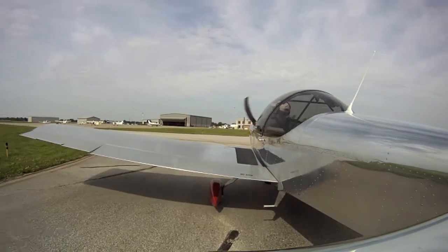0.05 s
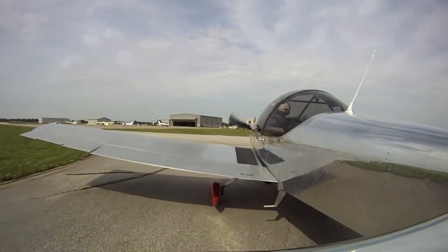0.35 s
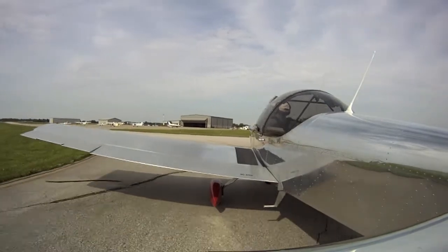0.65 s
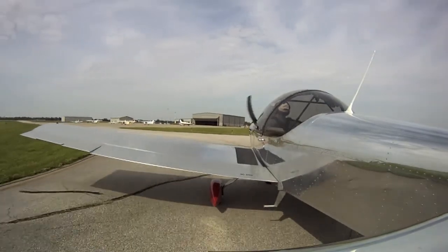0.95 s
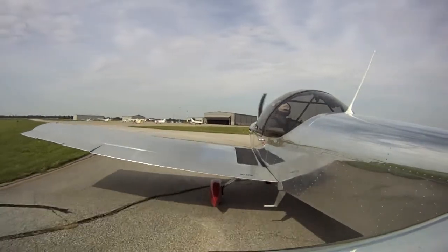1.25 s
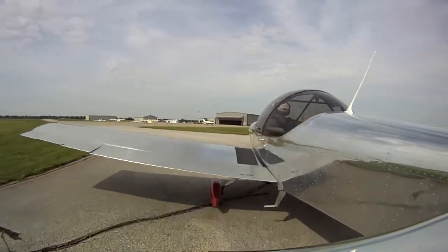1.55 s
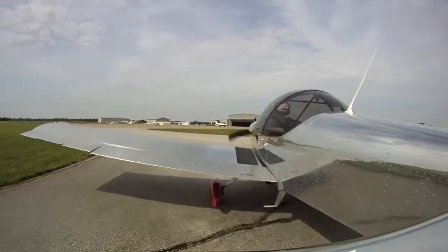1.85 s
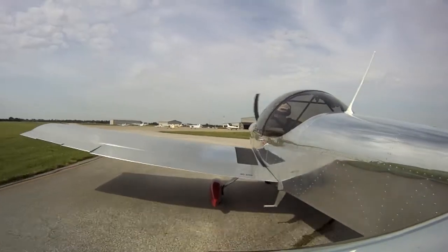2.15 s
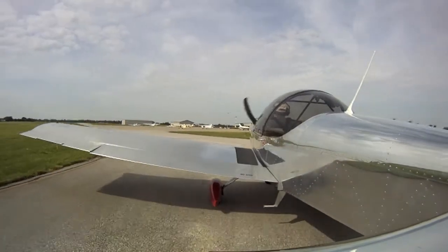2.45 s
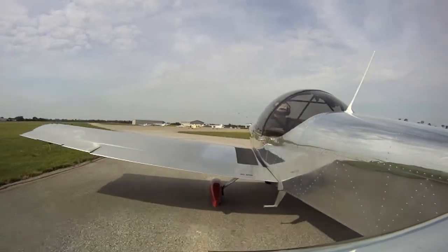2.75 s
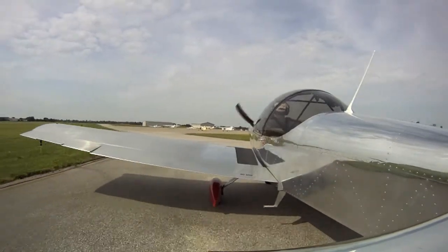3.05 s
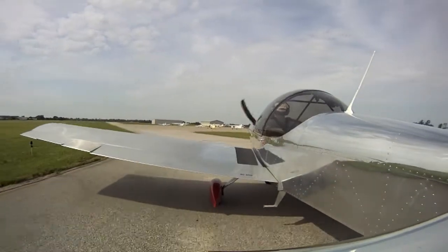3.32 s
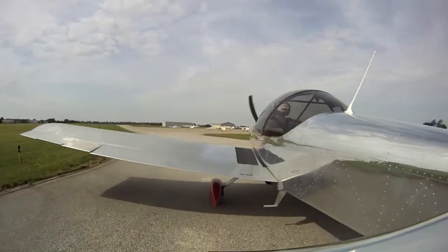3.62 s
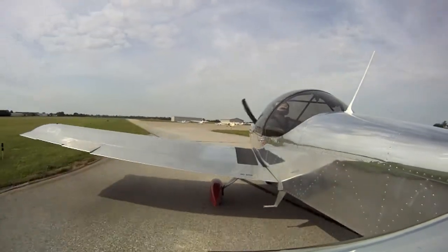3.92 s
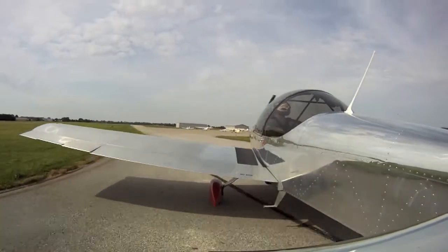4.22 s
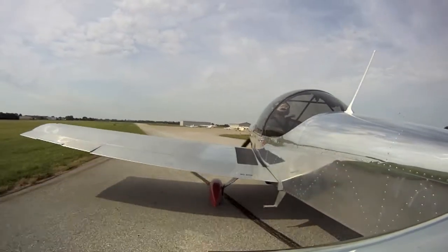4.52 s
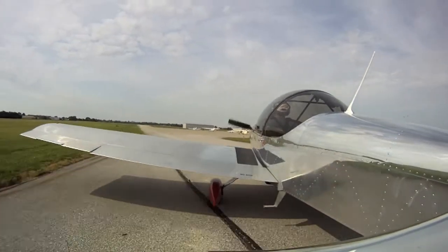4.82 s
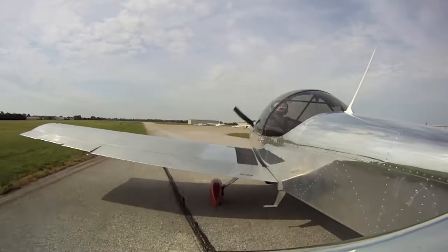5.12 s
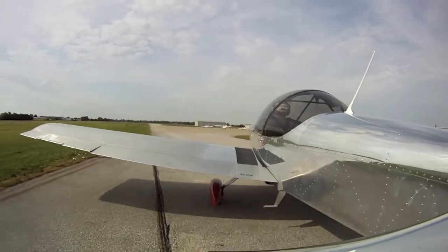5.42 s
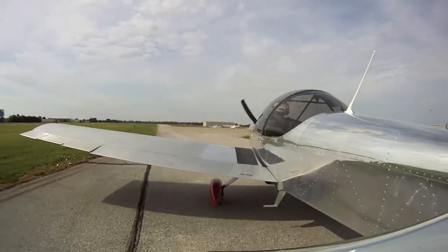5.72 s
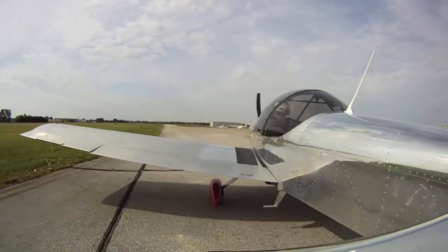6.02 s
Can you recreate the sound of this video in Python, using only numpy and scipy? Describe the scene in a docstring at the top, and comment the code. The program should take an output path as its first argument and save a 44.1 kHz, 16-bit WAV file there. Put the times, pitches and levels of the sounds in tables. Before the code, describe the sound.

A small propeller plane taxis, heard from its tail as a deep drone and rumble with rushing propeller wind. The engine revs up over the first half second, with two slaps of air on the microphone around 0.3 seconds, then drops back by 1 second into a steady, booming drone. From about 2 seconds the pitch eases down, falling more clearly between 3 and 4 seconds to a rough, thumping idle. The rapid exhaust crackle, edged with a thin treble fizz, stands out from 2.5 to 5 seconds, with sharper cracks near 4.4 seconds. A few dull airframe knocks come between 4.6 and 5.2 seconds, and light wind slaps continue until about 5.8. After 5 seconds the engine slows further and grows quieter, and a few faint, thin squeaks sound around 6 seconds.

```python
"""The two-blade propeller and six-cylinder engine of a taxiing light aircraft drone at a camera on its tail.
The engine speeds up briefly, then is throttled back to idle; its tones boom as they cross the tail's
resonance. The exhaust thumps and crackles at each firing, and the turbulent propeller wash buffets the
camera housing, over dull knocks and thin squeaks. The camera holds its samples at a low rate, which
mirrors the sound into a thin treble fizz."""
import sys
import numpy as np
from scipy import signal
from scipy.fft import rfft, irfft, next_fast_len
from scipy.io import wavfile
from scipy.ndimage import uniform_filter1d, map_coordinates

SR = 44100
rng = np.random.default_rng(int(sys.argv[2]) if len(sys.argv) > 2 else 0)


def unload_audio(sound):
    """Save the sound as a 16-bit wav file, at the path given as the first command line argument."""
    columns = np.transpose(np.atleast_2d(sound))
    # keep every value between -1 and 1, then stretch to whole-number steps
    steps = np.round(np.clip(columns, -1, 1) * 32767)
    wavfile.write(sys.argv[1], SR, steps.astype(np.int16))


N = 272097
TAXI_RATE = 70  # reference engine speed [firings/s]


def drone(turns, rate, rumble_db, blade_db=-15, firing_db=-17, octave_db=-20.5, waver_db=2.0):
    """Forced resonance: two blade passages and three firings per shaft turn drive the tail."""
    # response of the tail, booming near 50 Hz: (frequency [Hz], gain [dB])
    tail = [(24, -19), (32, -10), (38, -6), (42, -3.5), (49, -1), (58, -7.5), (67, -14.5), (74, -23),
            (87, -7.5), (98, -5.5), (120, -16), (136, -14.5), (147, -27.5), (175, -12)]
    # brief dips of the drone: (time [s], gain [dB])
    dips = [(0.2, -9), (4.84, -6), (5.07, -1.5), (6.15, -8)]
    shaft_hz = rate / 3
    dip_db = swells(dips, half_s=0.048)
    boom = lambda order, db: shaft_tone(turns, order, db + along(tail, order * shaft_hz) + dip_db)
    blades = boom(2, blade_db + 16.5 * np.log2(rate / TAXI_RATE))  # a faster propeller drives harder
    # the engine's tones fade as the throttle closes, the firing tone's octave twice as fast
    closing_db = 2.5 * np.maximum(np.arange(N) / SR - 4.44, 0)
    firing = boom(3, firing_db + waver_db * wobble(20))
    octave = boom(6, octave_db - closing_db + waver_db * wobble(20))
    return blades + amp(-closing_db) * (firing + octave + overtones(turns, shaft_hz, rumble_db + 1))


def overtones(turns, shaft_hz, level_db, rough_db=3.0):
    """Structure-borne sound: weak engine orders flare as they slide through the airframe's resonances."""
    # a four-stroke cycle allows half orders: (order [cycles/turn], relative level [dB])
    orders = [(1.5, -14), (4, -16), (5, -30), (7, -27), (9, -21.5), (12, -28), (15, -32.5)]
    # transmission through the airframe: (frequency [Hz], gain [dB])
    airframe = [(140, -4.5), (175, 5.5), (200, -8), (225, -1), (275, -1.5), (310, -6.5), (450, -27)]
    flare = lambda order: along(airframe, order * shaft_hz) + rough_db * wobble(16)
    return sum(shaft_tone(turns, order, level_db + db + flare(order)) for order, db in orders)


def rumble(firings, rate, level_db, uneven_db=-2, buffet_db=-3, split_hz=190):
    """Random excitation: unequal firings and eddies of wash thud against the tail."""
    # spectrum of the rumble: (frequency [Hz], relative density [dB])
    spectrum = [(12, -2.5), (22, -5), (35, 1), (50, 5), (70, -0.5), (100, -2.5), (140, -11), (175, -13),
                (210, -19.5), (260, -25), (330, -34.5), (400, -64)]
    pushes = bursts(firings, rng.standard_normal(len(firings)), rise_s=0.00015, fall_s=0.00019)
    body = lambda x: unit(coloured(x, lambda hz: along(spectrum, hz)))
    whole = amp(uneven_db) * body(pushes) + amp(buffet_db) * body(rng.standard_normal(N))
    low = signal.sosfiltfilt(signal.butter(4, split_hz, fs=SR, output="sos"), whole)
    brightness = amp(4 * np.log2(rate / TAXI_RATE))  # the rumble dulls as the engine slows
    return amp(level_db) * (low + brightness * (whole - low))


def crackle(firings, level_db, spit_db=0.5, ring_db=-11, puff_db=-4, ring_hz=4650, puff_lag_s=0.0036):
    """Pulsed jet noise: each firing leaves the pipe as a ringing spit, then a puff as the gas slows."""
    # spectrum of the bright spits and cracks: (frequency [Hz], relative density [dB])
    spit_spectrum = [(400, -46), (1500, -6), (2200, -28), (3300, -1.5), (4000, 5), (4500, 5), (5100, 3),
                     (5500, -2.5), (5950, -12.5), (6300, -78)]
    # spectrum of the duller puffs: (frequency [Hz], relative density [dB])
    puff_spectrum = [(800, -30), (1500, -31), (2500, 4), (3500, 10.5), (4200, -1), (5000, -4), (5800, 0),
                     (6300, -88)]
    # near idle the crackle skips a firing or two: (time [s])
    skips = [5.56, 5.86]
    strength, lateness, detune = rng.standard_normal((len(firings), 3)).T
    skipped = np.abs(firings[:, None] - skips).min(axis=1) < 0.022
    times = firings + 0.00033 * lateness
    sizes = amp(2.5 * strength - 25 * skipped)
    spits = unit(bursts(times, sizes, rise_s=0.0012, fall_s=0.0034))
    puffs = unit(bursts(times + puff_lag_s, sizes, rise_s=0.0015, fall_s=0.0048))
    # each spit rings at a slightly different pitch
    nearest_firing = np.searchsorted((firings[1:] + firings[:-1]) / 2, np.arange(N) / SR)
    ring = sine(ring_hz * np.exp(0.068 * detune)[nearest_firing])
    sharp = cracks()
    spitting = amp(level_db) * spits * (amp(spit_db) * patchy(depth_db=4.5) + amp(ring_db) * ring)
    puffing = amp(level_db + puff_db) * puffs * patchy(depth_db=4.5)
    return housed(spitting + sharp, spit_spectrum) + housed(puffing, puff_spectrum)


def cracks(gain_db=-15.5, ring_hz=4550, spread_hz=550):
    """Wave steepening: a few exhaust pulses sharpen into cracks that ring raggedly."""
    # the sharpest exhaust cracks: (time [s], relative peak level [dB])
    peaks = [(1.162, -15), (1.2442, -16), (1.543, -16), (2.566, -18), (3.0067, -16.5), (3.6022, -12.5),
             (3.834, -12), (4.08, -17), (4.4077, -8), (4.4493, -7), (5.0055, -19.5)]
    times, db = np.transpose(peaks)
    envelope = bursts(times + 0.001, amp(db + gain_db), rise_s=0.0005, fall_s=0.0011)
    return envelope * sine(ring_hz + spread_hz * wobble(1400))


def wash(sway_db):
    """Turbulence: in the propeller's wake over the housing, large eddies roar and small ones rush."""
    # the low roar between surges: (time [s], relative level [dB])
    roar_level = [(0.0, -43), (0.34, -34.5), (0.44, -39), (0.8, -36.2), (0.88, -43), (1.08, -40),
                  (1.38, -46), (2.04, -47.5), (2.94, -40.5), (4.82, -44.5), (6.16, -60.5)]
    # spectrum of the large eddies: (frequency [Hz], relative density [dB])
    roar_spectrum = [(100, -39.5), (200, -0.5), (300, -5), (380, -7), (470, -1.5), (560, -5), (760, -9.5),
                     (900, -6), (1300, -48), (3000, -82.5)]
    # the rush between surges: (time [s], relative level [dB])
    rush_level = [(0.0, -30.5), (0.18, -30.5), (0.3, -25), (0.56, -35), (0.72, -31), (0.92, -38.5),
                  (1.16, -35), (1.36, -40.1), (2.42, -41.5), (2.56, -34), (3.14, -35.5), (3.2, -39.2),
                  (3.3, -34), (4.94, -36.5), (5.28, -46), (5.66, -42.5), (5.88, -53.5), (6.16, -45)]
    # spectrum of the small eddies: (frequency [Hz], relative density [dB])
    rush_spectrum = [(300, -32), (600, -14), (800, -16), (1050, -4.5), (1650, -7.5), (2350, -5),
                     (2800, -12), (3600, -11.5), (4500, -20.5), (5200, -16), (5900, -34), (6300, -69.5)]
    swirl = lambda: unit(amp(1.3 * wobble(55) + 1.8 * wobble(220)))  # gusts and faster flutter
    roar = amp(curve(roar_level) + sway_db + 0.3) * swirl() * patchy(depth_db=1.9)
    rush = amp(curve(rush_level) + sway_db + 0.33) * swirl() * patchy(depth_db=2.0)
    return housed(roar, roar_spectrum) + housed(rush, rush_spectrum)


def slaps(gain_db=-8):
    """Pressure transients: single strong eddies smack the housing."""
    # eddy strikes: (time [s], relative peak level [dB])
    strikes = [(0.257, -20), (0.377, -13), (4.607, -28), (4.739, -20), (5.231, -23), (5.613, -26.5),
               (5.76, -30.5)]
    # spectrum of a slap: (frequency [Hz], relative density [dB])
    spectrum = [(250, -27), (520, -18), (800, -12), (1200, 4), (1700, 6.5), (2400, 8.5), (3200, -13.5),
                (4600, -12), (5600, -27), (6300, -94)]
    times, db = np.transpose(strikes)
    envelope = bursts(times + 0.002, amp(db + gain_db), rise_s=0.001, fall_s=0.013)
    return housed(envelope * patchy(depth_db=-1.0), spectrum)


def knocks(gain_db=-4):
    """Damped vibration: the airframe knocks dully as it rolls."""
    # knocks of the airframe: (time [s], relative peak level [dB])
    impacts = [(4.656, -28), (4.838, -29), (5.122, -29.5), (5.21, -33)]
    # spectrum of a knock: (frequency [Hz], relative density [dB])
    spectrum = [(200, -21), (450, -7), (630, 1), (800, -8), (1100, -4), (1800, -28), (5000, -60)]
    times, db = np.transpose(impacts)
    envelope = bursts(times + 0.002, amp(db + gain_db), rise_s=0.002, fall_s=0.011)
    return housed(envelope * rng.standard_normal(N), spectrum)


def squeaks(waver=0.00726):
    """Frequency modulation: brief, thin tones waver in pitch as the engine slows."""
    # squeaks near idle: (time [s], pitch [Hz], peak level [dB])
    chirps = [(5.895, 2200, -48), (5.968, 2440, -43), (6.042, 2235, -40.5), (6.07, 2460, -46)]
    envelope = lambda s, db: bursts(np.array([s]), [amp(db)], rise_s=0.004, fall_s=0.019)
    return sum(envelope(s, db) * sine(hz * (1 + waver * wobble(130))) for s, hz, db in chirps)


def housed(x, spectrum):
    """Source and filter: x takes on a spectrum and the housing's resonances; white noise keeps its level."""
    # resonances and dips of the camera housing: (frequency [Hz], width [Hz], gain [dB])
    modes = [(515, 50, 8), (710, 30, 5), (885, 90, 5), (1170, 80, 5), (1290, 50, -4), (1465, 65, 6),
             (1795, 110, 5), (2160, 80, 5), (2350, 40, 4), (2570, 70, -5), (2700, 60, 3), (3035, 80, 6),
             (3300, 130, -8), (3655, 70, 3), (3990, 70, -3), (4150, 110, 3)]
    housing_db = lambda hz: sum(db / (1 + (2 * (hz - f) / width) ** 2) for f, width, db in modes)
    gain_db = lambda hz: along(spectrum, hz) + housing_db(hz)
    power_gain = np.mean(amp(gain_db(np.linspace(0, SR / 2, 4096))) ** 2)
    return coloured(x, gain_db) / np.sqrt(power_gain)


def coloured(x, gain_db, size=8192):
    """Minimum-phase filtering of x, with the gain in dB a function of frequency."""
    hz = np.fft.rfftfreq(size, 1 / SR)
    cepstrum = irfft(np.log(amp(gain_db(hz)) + 1e-6))
    cepstrum[1:size // 2] *= 2
    cepstrum[size // 2 + 1:] = 0
    response = irfft(np.exp(rfft(cepstrum)))
    return signal.oaconvolve(x, response)[:N]


def patchy(depth_db):
    """Spectral modulation: noise of rms 1 swells and thins in patches of pitch and time."""
    spectra = signal.stft(rng.standard_normal(N), nperseg=256)[2]
    field = uniform_filter1d(rng.standard_normal(spectra.shape), size=5, axis=0)
    field = uniform_filter1d(field, size=10, axis=1)
    return unit(signal.istft(spectra * amp(depth_db * unit(field)), nperseg=256)[1][:N])


def bursts(times, sizes, rise_s, fall_s):
    """Exponential growth and decay: an envelope with a peak of each size at its time."""
    hits = np.bincount(np.clip(np.round(times * SR).astype(int), 0, N), sizes, N + 1)[:N]
    t = np.arange(-SR // 10, SR // 10 + 1) / SR
    shape = np.exp(-np.abs(t) / np.where(t < 0, rise_s, fall_s))
    return signal.fftconvolve(hits, shape, "same")


def shaft_tone(turns, order, db):
    """Phase locking: a tone of rms level db makes `order` cycles per shaft turn."""
    return np.sqrt(2) * amp(db) * np.cos(2 * np.pi * order * turns)


def sine(hz):
    """A gliding tone whose phase is the integral of its frequency."""
    return np.sin(2 * np.pi * np.cumsum(hz) / SR)


def wobble(rate, steps=6):
    """A smooth random curve, rate knots a second."""
    knots = rng.standard_normal(int(N * rate / SR) + 4)
    grid = np.arange(len(knots) * steps) / steps
    return np.interp(np.arange(N) * rate / SR, grid, map_coordinates(knots, [grid]))


def swells(rows, half_s):
    """Gaussian rises and dips from (time [s], gain [dB]) rows."""
    t = np.arange(N) / SR
    return sum(db * np.exp(-((t - s) / half_s) ** 2) for s, db in rows)


def curve(rows):
    """Linear interpolation of (time [s], value) rows at every sample."""
    return np.interp(np.arange(N) / SR, *np.transpose(rows))


def along(rows, hz):
    """Interpolation of (frequency [Hz], value) rows on a logarithmic axis."""
    f, values = np.transpose(rows)
    return np.interp(np.log(hz + 1), np.log(f + 1), values)


def amp(db):
    """Decibels to gain."""
    return 10 ** (np.asarray(db) / 20)


def unit(x):
    """x at rms 1."""
    return x / np.sqrt(np.mean(x ** 2) + 1e-20)


def scene():
    """Superposition: one shaft times propeller and exhaust; gusts sway wash and crackle together."""
    # engine speed: (time [s], rate [firings/s])
    speed = [(0.0, 74.38), (0.2, 83.69), (0.44, 89.76), (0.74, 86.24), (1.06, 74.92), (1.38, 72.95),
             (2.06, 73.98), (2.66, 67.61), (3.01, 67.96), (3.6, 53.12), (3.9, 49.46), (4.38, 47.97),
             (5.16, 49.86), (5.83, 39.9), (6.17, 37.93)]
    # the low rumble: (time [s], relative level [dB])
    rumble_level = [(0.0, -26), (0.38, -21), (1.5, -26.5), (2.36, -28), (2.76, -20), (3.5, -22),
                    (3.92, -21), (5.3, -26.5), (5.82, -35.5), (6.16, -31.5)]
    # the exhaust's crackle between surges: (time [s], relative level [dB])
    crackle_level = [(0.0, -41), (2.04, -50), (2.42, -48.5), (2.52, -40.5), (2.82, -44.5), (3.0, -44.5),
                     (3.24, -43.5), (3.5, -40), (4.94, -41.5), (5.52, -54.5), (5.58, -47), (6.16, -53.5)]
    # brief surges (+) and lulls (-) of wash and crackle: (time [s], gain [dB])
    surges = [(0.12, -5), (2.17, 3), (3.0, 5.5), (3.11, -2.5), (3.49, -4), (3.93, -5), (3.83, 3.5),
              (4.14, 3.5), (4.28, -2.5), (4.70, -6), (5.03, -2.5), (5.57, -5.5), (5.87, -2)]
    rate = curve(speed)
    cycles = np.cumsum(rate) / SR + 0.45
    turns = cycles / 3
    firings = np.flatnonzero(np.diff(np.floor(cycles))) / SR
    sway_db = 0.5 * wobble(16) + swells(surges, half_s=0.052)
    rumble_db = curve(rumble_level)
    engine = drone(turns, rate, rumble_db) + rumble(firings, rate, rumble_db)
    exhaust = crackle(firings, curve(crackle_level) + sway_db)
    return (engine + exhaust + wash(sway_db) + slaps() + knocks() + squeaks())[None]


def record(dry, hold_hz=12000, top_hz=15300):
    """Spectral imaging: sample-and-hold mirrors the sound about the hold rate, up to a band limit."""
    mirrored = dry * (1 + 2 * np.cos(2 * np.pi * hold_hz * np.arange(N) / SR))
    size = next_fast_len(N + SR // 2)
    hz = np.fft.rfftfreq(size, 1 / SR)
    response = np.sinc(hz / hold_hz) * (hz < top_hz)
    return irfft(rfft(mirrored, size) * response, size)[:, :N]


dry = scene()
out = record(dry)
unload_audio(out)
```